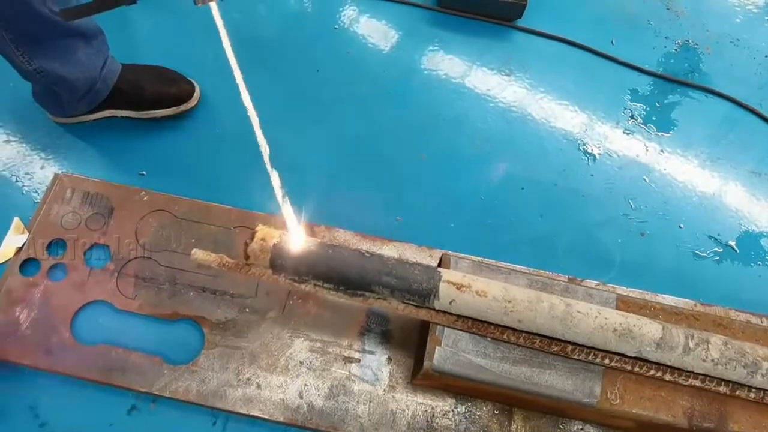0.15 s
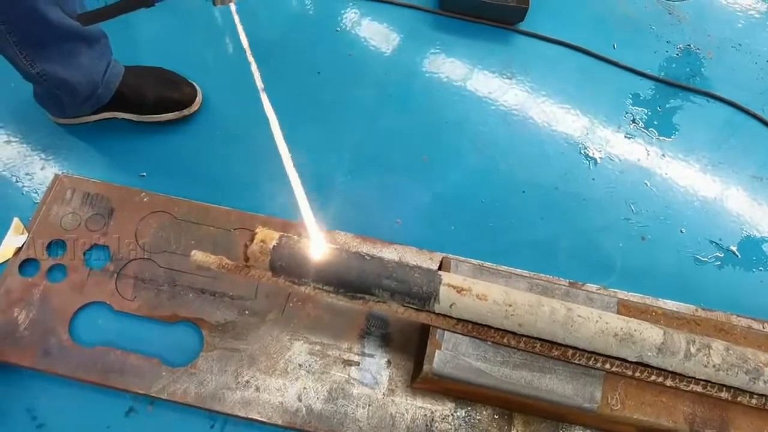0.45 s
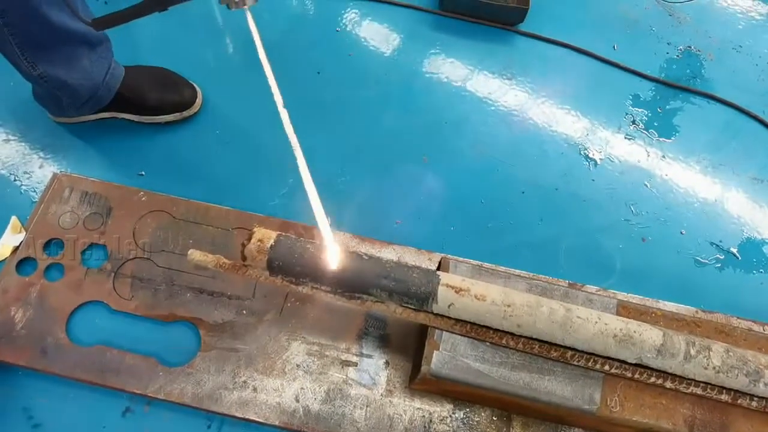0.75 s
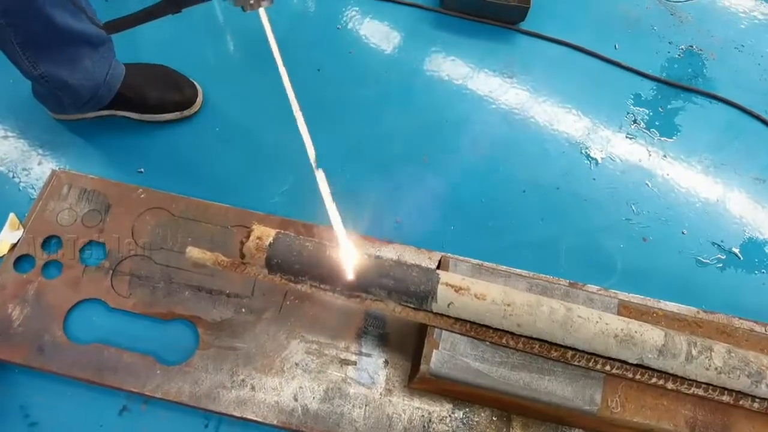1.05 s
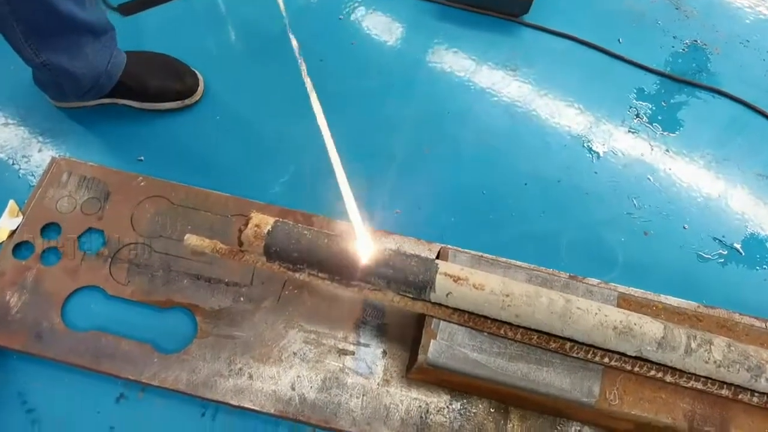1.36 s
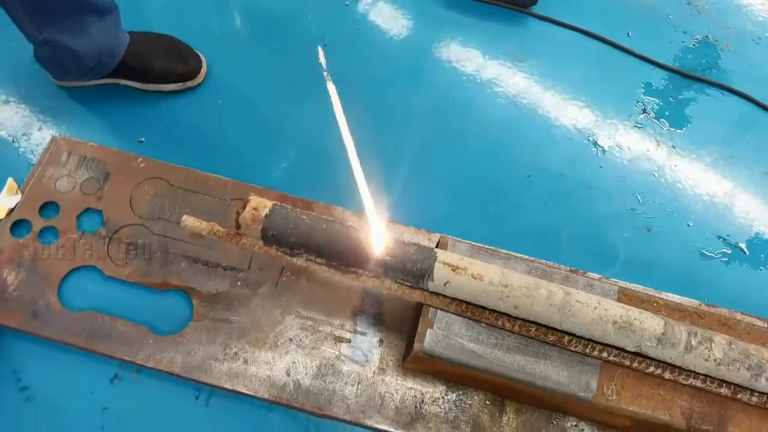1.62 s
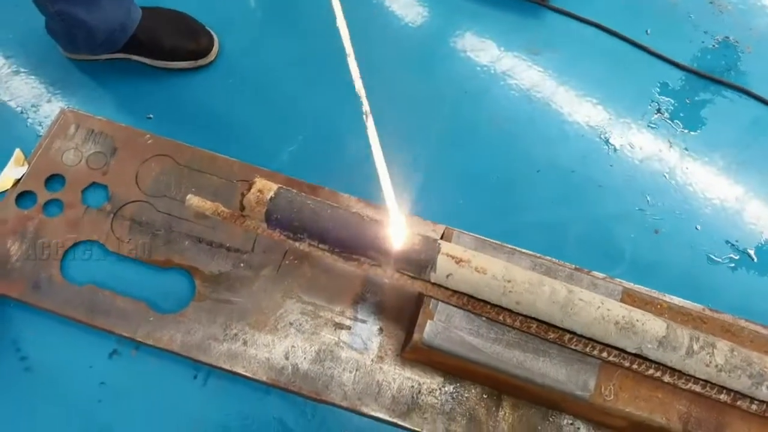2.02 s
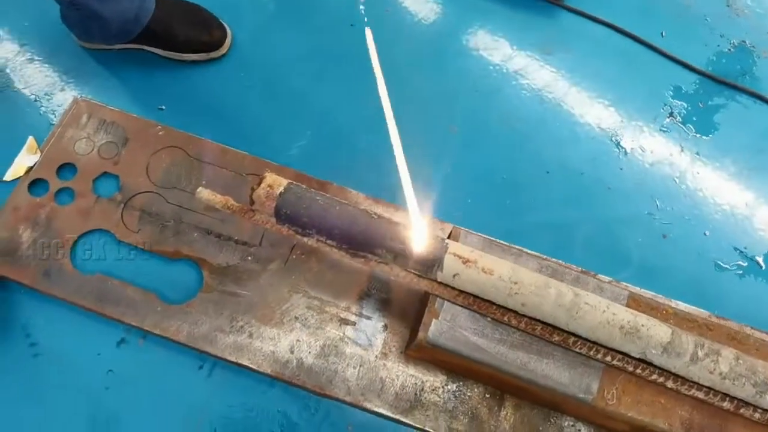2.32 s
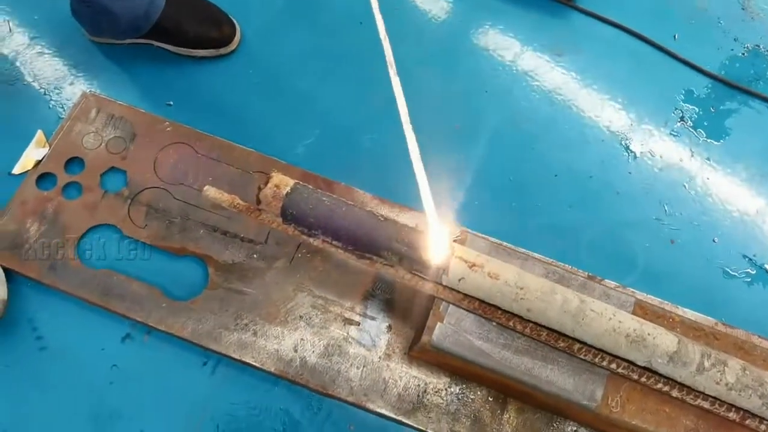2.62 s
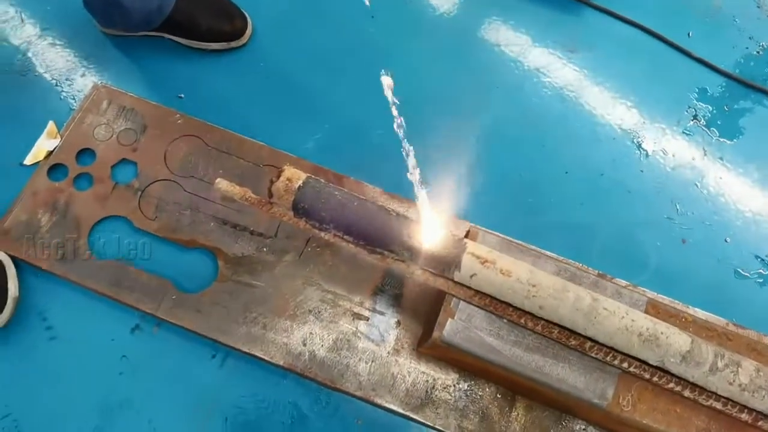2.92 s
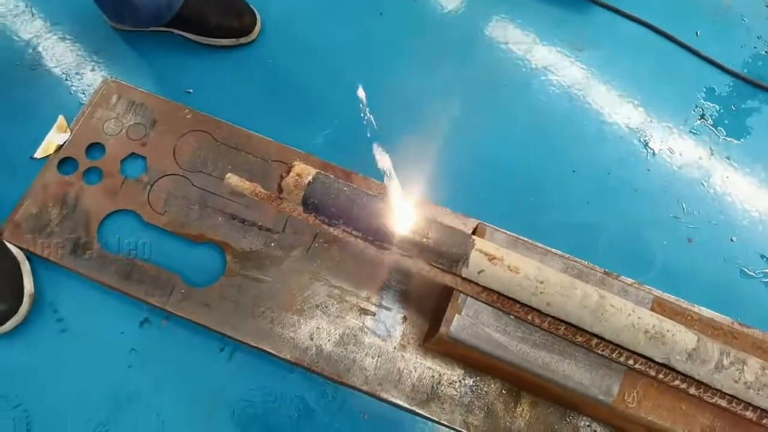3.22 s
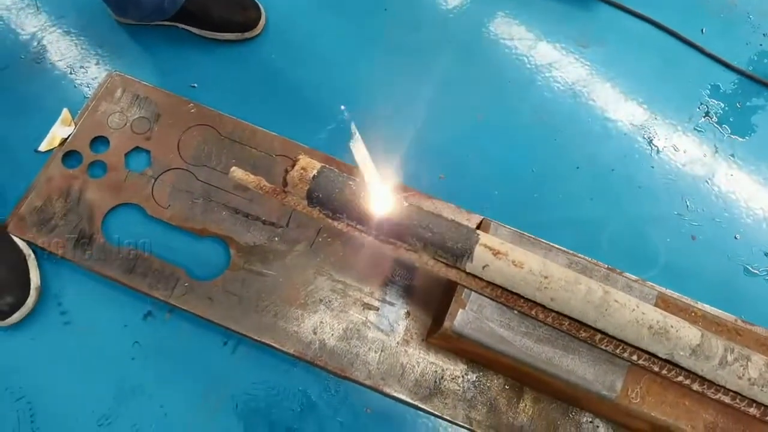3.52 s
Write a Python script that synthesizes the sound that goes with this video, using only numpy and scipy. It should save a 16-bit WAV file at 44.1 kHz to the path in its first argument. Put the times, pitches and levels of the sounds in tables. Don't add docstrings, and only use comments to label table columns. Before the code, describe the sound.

A hand-held laser burns rust off a steel bar with a continuous gritty, bright fizzing buzz, irregular pops early on, faint workshop fan hum behind, and low wind buffeting the close stereo microphone after two seconds.

```python
import sys
import numpy as np
from scipy import signal
from scipy.fft import rfft, irfft
from scipy.io import wavfile
from scipy.ndimage import uniform_filter1d, map_coordinates

SR = 44100
rng = np.random.default_rng(int(sys.argv[2]) if len(sys.argv) > 2 else 0)


def wav_out(sig):
    wavfile.write(sys.argv[1], SR, np.round(np.clip(np.atleast_2d(sig).T, -1, 1) * 32767).astype(np.int16))


def boost(x):
    u = np.asarray(x, float) / 20
    return 10 ** u


N = 161847
T = np.arange(N) / SR


def unit(x):
    return x / np.sqrt(np.mean(np.abs(x) ** 2) + 1e-20)


def along(points, hz):
    f, v = np.transpose(points)
    return np.interp(np.log(hz + 1), np.log(f + 1), v)


def curve(rows, t):
    return np.interp(t, *np.transpose(rows))


def bump(x, centre, width):
    return np.exp(-((x - centre) / width) ** 2)


def wobble(rate_hz):
    coarse = np.arange(0, N + 64, 64)
    knots = rng.standard_normal(int(N * 100 / SR) + 4)
    return np.interp(np.arange(N), coarse, map_coordinates(knots, [coarse * rate_hz / SR]))


def patches(shape, bins, frames):
    field = uniform_filter1d(rng.standard_normal(shape), size=bins, axis=0)
    return unit(uniform_filter1d(field, size=frames, axis=1))


# (time [s], share [0-1])
FACING = [(0, 0.01), (.2, 0.06), (.45, 0.1), (.8, 0.16), (1.1, 0.34), (1.35, 0.48), (1.65, 0.49),
          (1.95, 0.6), (2.2, 0.88), (2.4, 0.84), (2.6, 1), (2.85, 0.97), (3.15, 0.69), (3.4, 0.62),
          (3.67, 0.4)]
SCAN_HZ = 129.82
PATH_CYCLES, PATH_GROWS_CYCLES = .016, .104


def scan():
    return SCAN_HZ * T + PATH_CYCLES - PATH_GROWS_CYCLES * curve(FACING, T)


# (time [s], level [dB])
BURN_DB = [(0.0, -25.5), (0.39, -20.5), (0.42, -24.5), (0.5, -20), (0.57, -29), (0.61, -22.5), (0.9, -24.5),
           (0.97, -19.5), (0.99, -24), (1.15, -21.5), (1.18, -23.5), (1.75, -20), (1.76, -21.5),
           (2.43, -20), (2.76, -18), (3.26, -18), (3.29, -17), (3.67, -18.5)]
# (time [s], peak [dB])
FLAKES = [(0.1141, -13), (0.1191, -8), (0.2678, -1), (0.4838, 1), (0.604, -6), (0.7811, -10), (0.9004, 1),
          (0.9217, -6), (0.9587, 1), (1.0301, 0), (1.1838, -8), (1.3818, -21), (1.497, -17), (1.6212, -23),
          (1.6591, -9), (1.7858, -16), (1.8213, -15), (1.8447, -13), (3.3802, -2), (3.5234, -14)]
PASS_DB, SHARPNESS = 11, 1.3
BACK_DB, BACK_WEAKENS_DB = -1.5, 5
PASS_SCATTER_DB, GRIT_DB = 2, 2


def passes():
    crossing = 2 * scan() + .5
    index = np.floor(crossing).astype(int)
    returning = index % 2 == 0
    size_db = PASS_SCATTER_DB * rng.standard_normal(index[-1] + 2)[index]
    size_db += returning * (BACK_DB - BACK_WEAKENS_DB * curve(FACING, T))
    for s, peak_db in FLAKES:
        popping = index == index[round((s + .001) * SR)]
        size_db[popping] = (peak_db - 6 - curve(BURN_DB, s)) / 2
    bursts = 1 + boost(PASS_DB + size_db) * np.sin(np.pi * crossing % np.pi) ** (2 * SHARPNESS)
    grit_db = GRIT_DB * unit(uniform_filter1d(rng.standard_normal(N), size=12))
    return bursts * boost(grit_db)


# (frequency [Hz], width [Hz], level [dB])
PLATE = [
    (1522, 55, 6),
    (1950, 80, 7.5),
    (2550, 138, 3),
    (3383, 200, 7),
    (4190, 170, 6.5),
    (5680, 82, -1),
]
# (time [s], lasts [s], frequency [Hz], width [Hz],
# level [dB])
RINGS = [(0.062, 0.2, 5260, 660, 2.5), (.33, 0.11, 6000, 500, -5), (0.397, 0.4, 7500, 800, -1),
         (.8, 0.62, 8100, 700, 0.5), (2.504, 0.49, 12000, 900, -10), (0.753, 0.16, 15500, 785, -21),
         (3.55, 0.12, 4300, 600, -2), (1.1, 0.57, 1600, 400, -2), (2.65, 0.17, 6200, 900, -1),
         (.3, 0.11, 1870, 120, 7), (1.104, .15, 3480, 250, 1.5), (1.21, 0.13, 4250, 250, 1),
         (1.75, 0.31, 2370, 200, 7), (2.077, .12, 5540, 250, 8.5), (2.09, 0.033, 4300, 250, 6),
         (2.45, 0.12, 7000, 400, 2.5), (2.736, 0.054, 1490, 250, 4.5), (2.702, 0.048, 5650, 300, 7),
         (2.917, 0.059, 2350, 300, 7.5), (3.107, 0.057, 2200, 503, 6.5), (3.3, 0.066, 2620, 200, 3),
         (3.52, 0.24, 1410, 99, 7), (3.548, .12, 3370, 100, 3)]


def steel(f, s):
    plate_db = sum(db * bump(f, hz, width) for hz, width, db in PLATE)
    rings_db = sum(db * bump(f, hz, width) * bump(s, at, lasts) for at, lasts, hz, width, db in RINGS)
    return boost(plate_db + rings_db)


# (frequency [Hz], level [dB per Hz])
LEFT_ASIDE = [(900, -17.5), (4000, -11.5), (5600, -2.5), (8200, 0.1), (9400, -4.5), (10800, -7.5),
              (12200, -14.5), (15800, -17.5)]
LEFT_FACING = [(900, -18), (4600, -10.5), (5800, -6), (7200, -6), (8500, 9), (10400, -8.5), (12000, -11.5),
               (15000, -13)]
RIGHT_ASIDE = [(900, -30), (4000, -18), (5600, 0), (8600, -2), (9400, -15), (11000, -16.5), (13000, -43),
               (15800, -15)]
RIGHT_FACING = [(1200, -29.5), (3500, -13), (4600, -10.5), (5800, -3.5), (8400, -1), (9300, -7.5),
                (12000, -19.5), (15000, -74)]
SHADOW_HZ, SHADOW_RISES_HZ, SHADOW_WIDTH_HZ = 9300, 2800, 700
SHADOW_LEFT_DB, SHADOW_RIGHT_DB = -11, -3


def port_gains(f, u):
    notch = bump(f, SHADOW_HZ + SHADOW_RISES_HZ * u, SHADOW_WIDTH_HZ)
    left_db = (1.5 - u) * along(LEFT_ASIDE, f) + u * along(LEFT_FACING, f)
    right_db = (1 - u) * along(RIGHT_ASIDE, f) + u * along(RIGHT_FACING, f)
    return boost(left_db + SHADOW_LEFT_DB * notch), boost(right_db + SHADOW_RIGHT_DB * notch)


# (frequency [Hz], phase [rad])
TURN_FACING = [(2000, 0), (3100, -1.4), (4100, 0.1), (5100, -2), (6200, -1), (8200, -2.5), (10300, 1)]
TURN_ASIDE = [(2000, 1.25), (3100, 0), (4100, -2.5), (5100, -4), (6200, -5), (8200, -8), (10300, -9)]
TURN_SWING = [(2000, -1), (3100, -2), (5100, -3.5), (6200, -3.5), (8200, -3), (10300, -0.5)]
SWING_S = 0.11


def port_phase(f, s, u):
    turned = u * along(TURN_FACING, f) + (1 - u) * along(TURN_ASIDE, f)
    return np.exp(1j * (turned + np.exp(-s / SWING_S) * along(TURN_SWING, f)))


# (frequency [Hz], share [0-1])
DIFFUSE = [(600, 0.23), (1200, 0.84), (2500, 0.68), (5000, 0.61), (8000, 0.4), (12000, 0.73)]
SMOOTH_BELOW_HZ, SMOOTH_DEPTH = 4900, 0.23
SLOW_DB, FAST_DB, PATCHY_DB = .2, .9, 2


def plasma():
    envelope = passes()
    fizz = rng.standard_normal(N)
    crackle = unit(envelope * fizz)
    roar = unit(envelope ** SMOOTH_DEPTH * fizz)
    walls = rng.standard_normal((2, N))
    level = boost(curve(BURN_DB, T) + SLOW_DB * wobble(8.53) + FAST_DB * wobble(30.01))
    hz, s, z = signal.stft(level * np.vstack([crackle, walls, roar]), SR, nperseg=256)
    f, u = hz[:, None], curve(FACING, s)
    crackle, wall_left, wall_right, roar = z * steel(f, s)
    share = along(DIFFUSE, f)
    plume = roar + (crackle - roar) / (1 + (SMOOTH_BELOW_HZ / (f + 1)) ** 4)
    direct = np.sqrt(1 - share ** 2) * plume * boost(PATCHY_DB * patches(plume.shape, 4, 10))
    left_gain, right_gain = port_gains(f, u)
    left = left_gain * (direct + share * wall_left)
    right = right_gain * (direct * port_phase(f, s, u) + share * wall_right)
    return boost(10.5) * signal.istft(np.array([left, right]), SR, nperseg=256)[1][:, :N]


STREAK_DB, STREAK_BELOW_HZ = 3.5, 6000


def streaks(x):
    hz, _, z = signal.stft(x, SR, nperseg=1024)
    depth_db = STREAK_DB / (1 + (hz[:, None] / STREAK_BELOW_HZ) ** 4)
    mean_power_db = depth_db ** 2 * np.log(10) / 20
    gain = boost(depth_db * patches(z.shape[1:], 2, 12) - mean_power_db)
    return signal.istft(z * gain, SR, nperseg=1024)[1][:, :N]


# (frequency [Hz], level [dB])
BUZZ = [(130, -53), (260, -75), (520, -61), (780, -64.5), (910, -65), (1040, -58.5), (1170, -71),
        (1300, -75), (1430, -59.5), (1820, -68), (2080, -61), (2340, -54), (2600, -55.5), (3120, -59.5)]
# (time [s], level [dB])
REPEAT = [(0, -2), (.25, 2.5), (.6, -4), (1.1, 0), (1.46, -9), (1.74, 0), (1.9, -3), (2.06, -2), (2.11, 4),
          (2.38, -2.5), (2.45, 8.5), (2.55, 1), (2.64, 5.5), (2.77, 5.5), (2.85, -4), (3.3, 0), (3.56, 3.5),
          (3.67, 3)]
BUZZ_SCATTER_DB, BUZZ_WAVER_DB = 1, 5
BUZZ_APART_RAD = .12
BUZZ_DRIFT_RAD, BUZZ_DRIFT_GROWS_RAD = .8, .11


def buzz():
    cycle, out = 2 * np.pi * scan(), np.zeros((2, N))
    swell_db = curve(BURN_DB, T) - np.mean(np.transpose(BURN_DB)[1])
    for k in range(1, 25):
        scatter, start, apart = rng.standard_normal(size=3)
        db = along(BUZZ, k * SCAN_HZ) + BUZZ_SCATTER_DB * scatter + BUZZ_WAVER_DB * wobble(21.91) + swell_db
        if k > 3:
            db = db + curve(REPEAT, T)
        drift = (BUZZ_DRIFT_RAD + BUZZ_DRIFT_GROWS_RAD * k) * wobble(9)
        spread = BUZZ_APART_RAD * k * apart * np.array([[.5], [-.5]])
        out += boost(db) * np.sin(k * cycle + np.pi * start + drift + spread)
    return out


# (frequency [Hz], correlation [0-1])
ALIKE = [(60, 1), (250, 0.96), (500, 0.84), (1000, 0.78)]
# (frequency [Hz], level [dB])
LEAN = [(250, -1), (600, -2), (1200, 4)]


def rush(spectrum):
    hz = np.fft.rfftfreq(N, 1 / SR)
    angle = np.arccos(along(ALIKE, hz)) / 2
    noise = rfft(rng.standard_normal((2, N))) * boost(along(spectrum, hz))
    mid, side = noise * [np.cos(angle), np.sin(angle)]
    lean = boost(along(LEAN, hz) * np.array([[.5], [-.5]]))
    return unit(irfft(np.array([mid + side, mid - side]) * lean, N))


# (time [s], level [dB])
WIND_DB = [(2.0, -80), (2.1, -59), (2.13, -36.5), (2.2, -29.5), (2.37, -24.5), (2.43, -34), (2.5, -25.5),
           (2.55, -33), (2.64, -35), (2.71, -31.5), (2.77, -40), (3.05, -42.5), (3.14, -47.5), (3.3, -39),
           (3.5, -37), (3.67, -38.5)]
# (frequency [Hz], level [dB per Hz])
RUMBLE = [(15, -60), (45, -19.5), (100, 6), (170, -0.5), (260, -12.5), (400, -19), (800, -65), (2500, -90)]
# (frequency [Hz], level [dB per Hz])
RUSTLE = [(100, -40), (220, -6.5), (330, -1), (500, 0), (680, -7), (1000, -11.5), (1400, -28), (3000, -67)]
LUMPS_DB, LUMPS_HZ = 1.2, 35
RUSTLE_DB, RUSTLE_GROWS, RUSTLE_SMOOTH_S = -41.5, 0.92, 0.16


def wind():
    gust_db = curve(WIND_DB, T)
    thumps = boost(gust_db) * unit(boost(LUMPS_DB * wobble(LUMPS_HZ)) * rush(RUMBLE))
    stream_db = uniform_filter1d(gust_db, int(RUSTLE_SMOOTH_S * SR))
    stream_db = np.minimum(stream_db, gust_db + 10)
    return thumps + boost(RUSTLE_DB + RUSTLE_GROWS * (stream_db + 30)) * rush(RUSTLE)


# (frequency [Hz], level [dB per Hz])
SHOP = [(35, -52), (70, -6), (120, -4), (210, 4), (310, -17), (600, -8.5), (1300, -28), (3000, -43)]
# (time [s], level [dB])
SHOP_LEVEL_DB = [
    (0.0, -54.5),
    (0.48, -52.5),
    (0.66, -64),
    (0.89, -49.5),
    (1.36, -52.5),
    (1.38, -73),
    (1.47, -46.5),
    (1.85, -67),
    (2.05, -53),
]
SHOP_DB, SHOP_SWELL_DB = 1.5, -0.5


def shop():
    return boost(curve(SHOP_LEVEL_DB, T) + SHOP_DB + SHOP_SWELL_DB * wobble(2.6)) * rush(SHOP)


def scene():
    return streaks(plasma()) + buzz() + wind() + shop()


def roll_off(x):
    return signal.sosfilt(signal.butter(12, 16080, fs=SR, output="sos"), x)


TOP_HZ, CEILING = 15750, .8


def record(dry):
    soft = dry / (1 + np.abs(dry / CEILING) ** 6) ** (1 / 6)
    passed = np.fft.rfftfreq(N, 1 / SR) < TOP_HZ
    mix = irfft(rfft(soft) * passed, N)
    return roll_off(mix)


dry = scene()
out = record(dry)
wav_out(out)
```